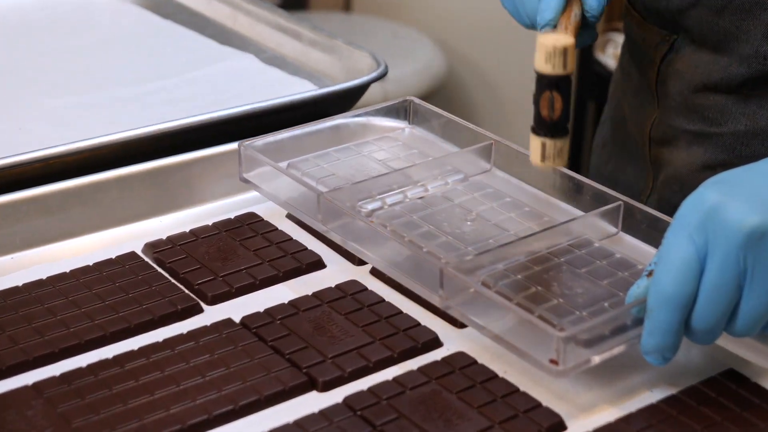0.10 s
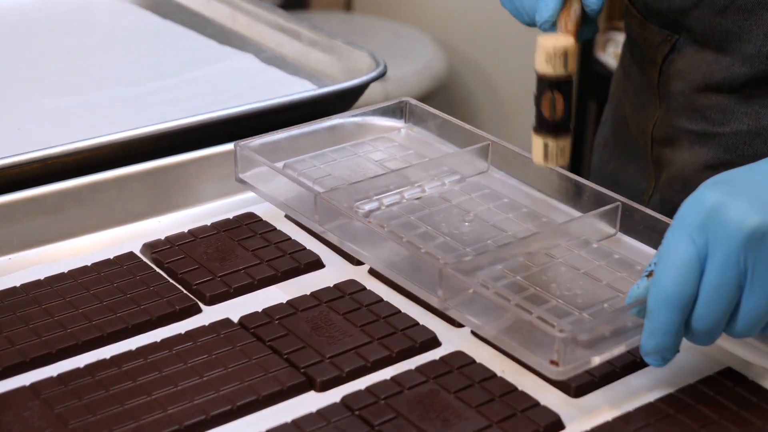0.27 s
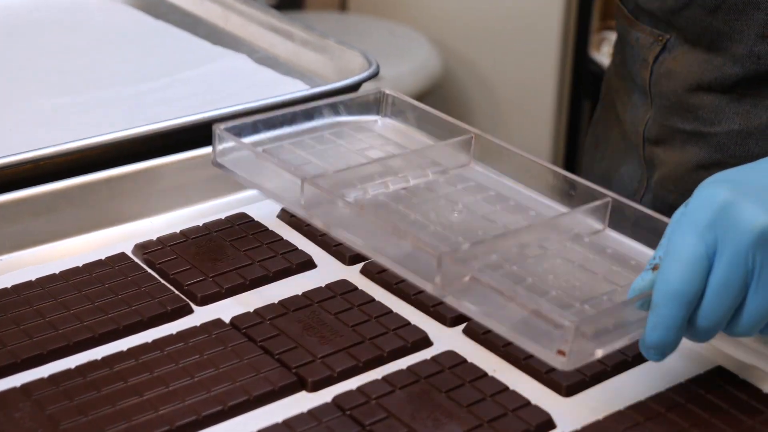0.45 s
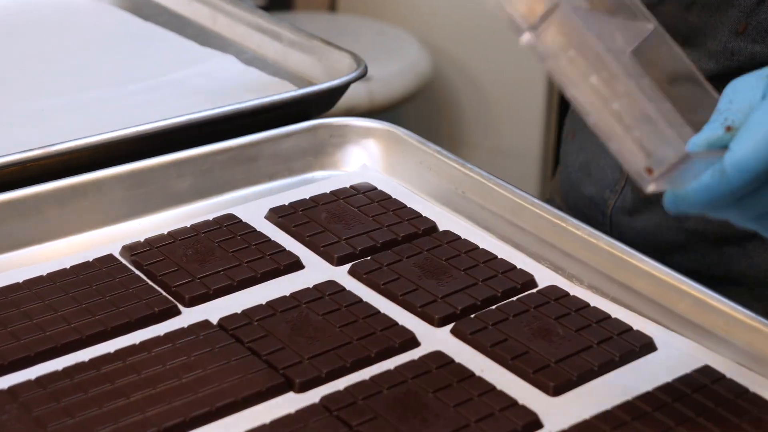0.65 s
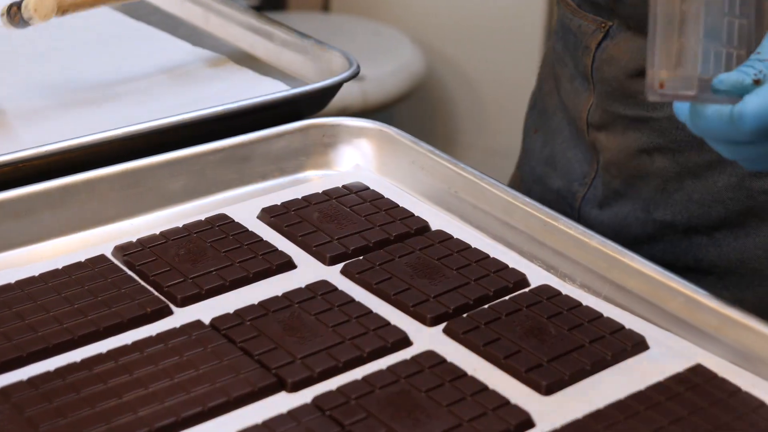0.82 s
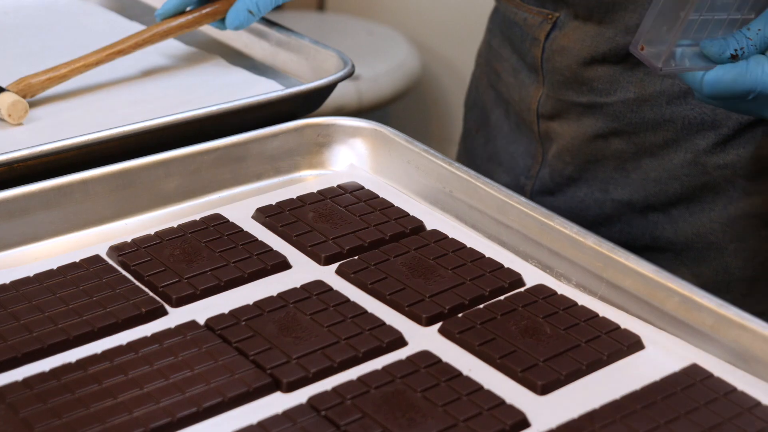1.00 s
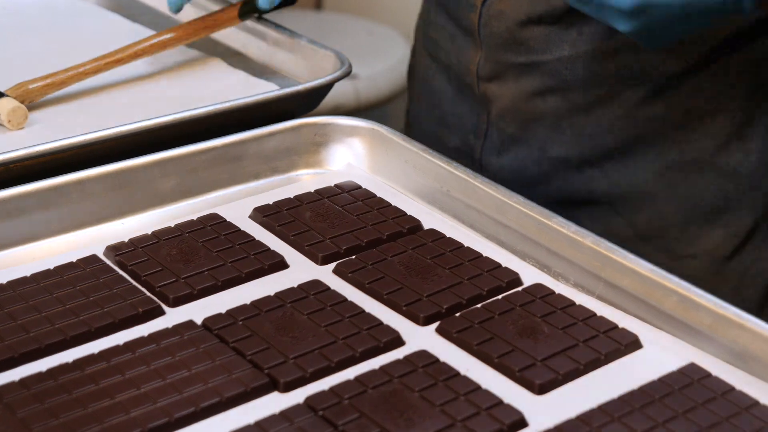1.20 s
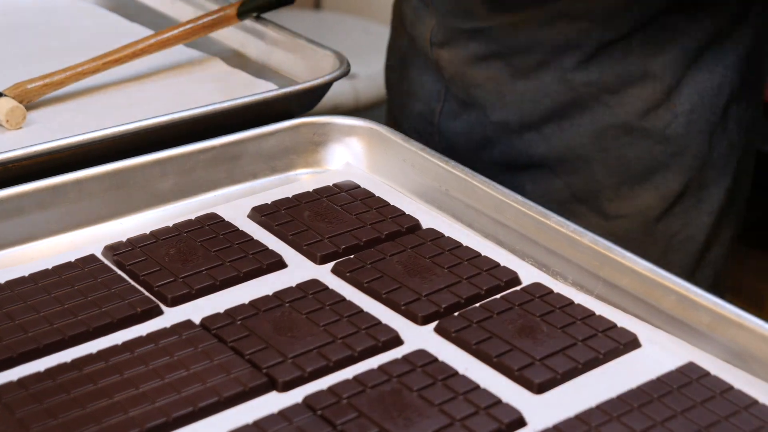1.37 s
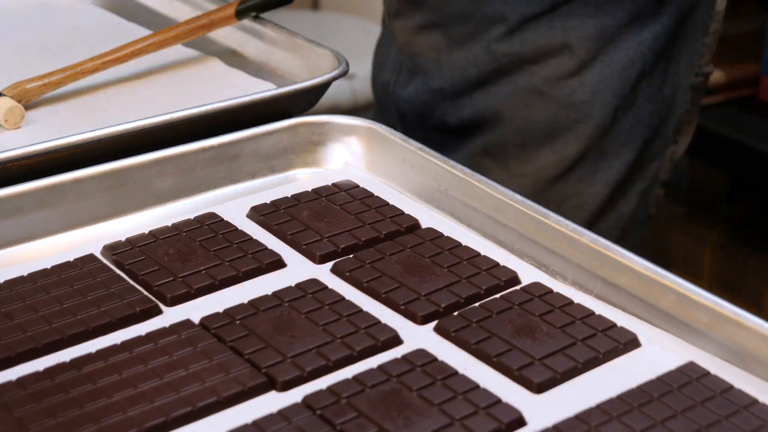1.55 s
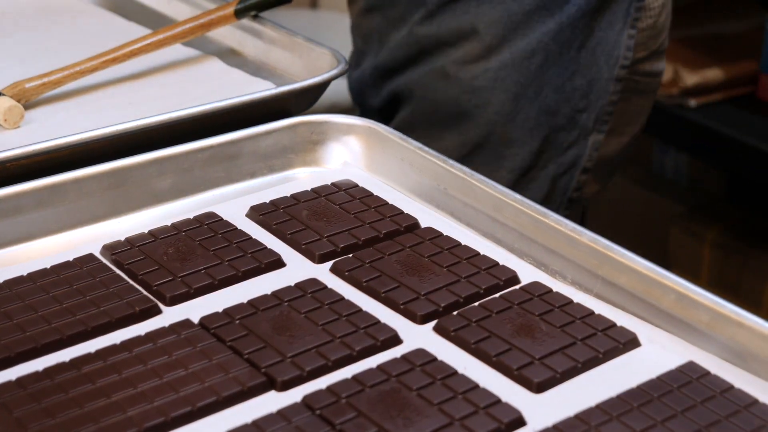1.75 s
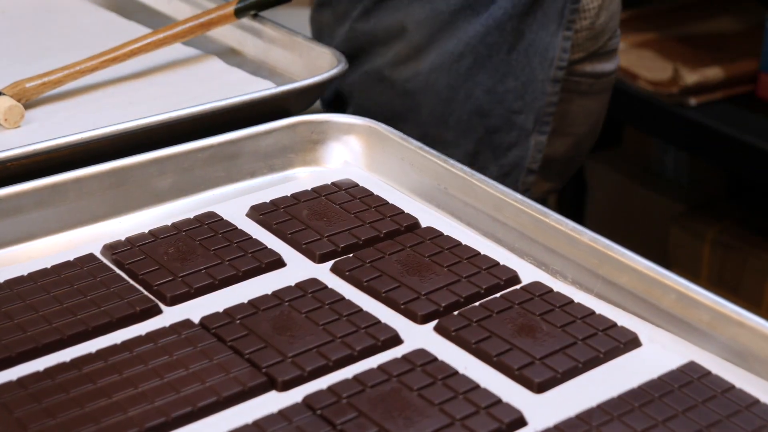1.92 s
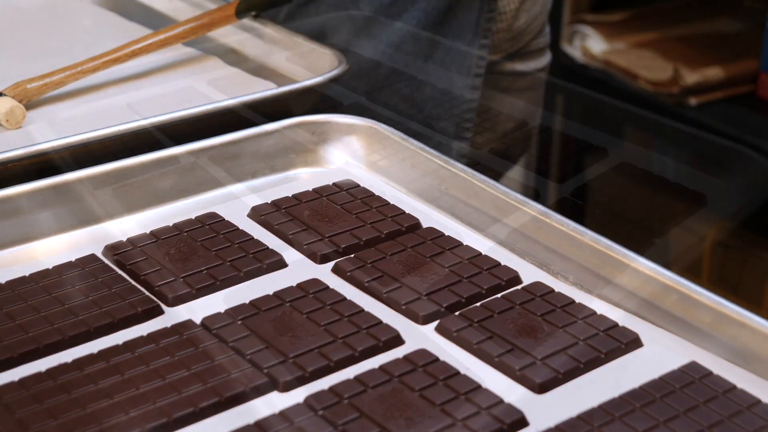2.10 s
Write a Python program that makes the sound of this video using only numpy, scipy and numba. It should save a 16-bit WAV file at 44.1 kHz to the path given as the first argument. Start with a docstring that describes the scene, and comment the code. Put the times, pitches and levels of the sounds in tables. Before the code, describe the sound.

Loud wooden mallet crack on hard plastic, quick chocolate clatter, then mallet set down on a metal tray

```python
"""A wooden mallet raps a plastic mould, chocolate bars drop onto a lined tray, then the mallet is laid on
a metal tray: head first with a bounce, then the handle. Each blow is a half-sine push on decaying modes,
plus a crack and a noisy ring. Cloth rustles faintly as grainy hiss; a small hard room rings with dense
echoes over ventilation noise and hum. The rap clips, and gain control ducks the sound for a moment."""
import sys
import numpy as np
from scipy import signal
from scipy.fft import rfft, irfft
from scipy.io import wavfile
from scipy.ndimage import uniform_filter1d
from numba import njit

SR = 44100
rng = np.random.default_rng(int(sys.argv[2]) if len(sys.argv) > 2 else 0)


def transcribe(signal):
    """Save signal, clipped to [-1, 1], as a 16-bit WAV file at the path in sys.argv[1]."""
    frames = np.atleast_2d(signal).T
    limited = np.clip(frames, -1, 1)
    pcm = np.round(limited * 32767).astype(np.int16)
    wavfile.write(sys.argv[1], SR, pcm)


def nominal_scale(level):
    """Amplitude ratio for a level in decibels (scalar or array-like)."""
    x = np.asarray(level, float) / 20
    return 10 ** x


N = 97020


def unit(x):
    """Scale to rms 1."""
    return x / np.sqrt(np.mean(x ** 2))


def colour(x, curve):
    """Filter by a (freq_hz, gain_db) curve, interpolated over log frequency."""
    freq_hz, gain_db = np.array(curve).T
    f = np.fft.rfftfreq(len(x), 1 / SR)
    gain = nominal_scale(np.interp(np.log(f + 1), np.log(freq_hz), gain_db))
    return irfft(rfft(x) * gain, len(x))


# ventilation spectrum: freq_hz, density_db (per Hz, relative)
AIR_SPECTRUM = [(12, -41), (20, -14), (58, -9), (66, -2.5), (81, -4), (141, -9.5), (202, -7.5), (308, -12),
                (385, -11.5), (494, -11.5), (817, -18), (1170, -21), (1550, -24), (1900, -26), (2600, -32),
                (3400, -28.5), (4500, -36.5), (5300, -46), (8000, -50), (11000, -55), (15700, -56),
                (15900, -93)]
AIR_RMS_DB = -45.5
# hum lines: pitch_hz, rms_db, width_hz
HUM_LINES = [(87, -48.5, 3.84), (119, -59.5, 8.9), (185, -55.5, 10.8), (264.4, -58, 17), (339, -60, 11.74),
             (388, -55.5, 15.95)]


def machines():
    """Ventilation is coloured noise; hum lines are sines slowly wavering in pitch and level."""
    def waver():
        noise = rng.standard_normal(N)
        return unit(uniform_filter1d(uniform_filter1d(noise, size=4000), size=4000))

    out = nominal_scale(AIR_RMS_DB) * unit(colour(rng.standard_normal(N), AIR_SPECTRUM))
    for pitch_hz, rms_db, width_hz in HUM_LINES:
        line_hz = pitch_hz + width_hz / 2 * waver()
        phase = 2 * np.pi * np.cumsum(line_hz) / SR
        out = out + nominal_scale(rms_db + 0.69 * waver()) * np.sqrt(2) * np.sin(phase)
    return out


# crack spectrum: freq_hz, density_db (per Hz, relative)
CRACK_SPECTRUM = [(1000, -1), (3000, 3.5), (5000, -6.5), (8000, -9.5), (11500, -9.5), (15500, -15),
                  (16500, -30)]
CRACK_T60_S = 0.0046
WOBBLE_RMS_DB, WOBBLE_ONSET_S = 4, 0.0033


def struck(blows, modes, blur):
    """Each blow: a half-sine push rings the wobbling modes; a crack and a noisy ring decay with it."""
    t = np.arange(SR // 2) / SR

    def decay(t60_s):
        return 1000. ** (-t / t60_s)

    def noise_burst(spectrum, t60_s):
        return unit(colour(rng.standard_normal(len(t)), spectrum)) * decay(t60_s)

    ring, sign = np.zeros(len(t)), 1
    for pitch_hz, level_db, t60_s in modes:
        drift = unit(uniform_filter1d(rng.standard_normal(len(t)), size=300))
        wobble = nominal_scale(WOBBLE_RMS_DB * np.minimum(t / WOBBLE_ONSET_S, 1) * drift)
        ring += sign * nominal_scale(level_db) * wobble * np.sin(2 * np.pi * pitch_hz * t) * decay(t60_s)
        sign = -sign  # neighbours in opposite phase

    blur_spectrum, blur_t60_s = blur
    out = np.zeros(N + SR)
    for start_s, level_db, contact_ms, crack_db, blur_db in blows:
        late_s = start_s * SR % 1 / SR  # sub-sample start
        push = np.sin(np.pi * np.clip((t[:64] - late_s) / (contact_ms / 1000), 0, 1))
        tonal = np.convolve(ring, push / push.sum())[:len(t)]
        crack = nominal_scale(crack_db) * noise_burst(CRACK_SPECTRUM, CRACK_T60_S)
        noisy = nominal_scale(blur_db) * noise_burst(blur_spectrum, blur_t60_s)
        out[int(start_s * SR):][:len(t)] += nominal_scale(level_db) * (tonal + crack + noisy)
    return out[:N]


# blow: start_s, level_db, contact_ms, crack_db, blur_db
RAP_BLOW = [(0.2178, 18.5, .25, -20, -19.5)]
# plastic modes: pitch_hz, level_db, t60_s
MOULD_MODES = [(553.3, -22.5, 0.079), (690, -16.5, 0.05), (717, 2.5, 0.013), (826.5, -14.5, 0.09),
               (895, -24.5, 0.12), (1250, -26.5, .1), (1182, -33, 0.034), (1456, -0.5, 0.014),
               (2100, -11, 0.0139), (3410, -21, 0.055), (4640, -15.5, .015), (7020, -50, 0.0033),
               (9300, -22, 0.0085)]
# close modes blurred to noise: [freq_hz, density_db (per Hz, relative)], t60_s
MOULD_NOISE = [(300, -30.5), (600, -3), (900, -15), (1300, -4.5), (2000, -1.5), (3600, -0.5), (4600, -15),
               (5200, -18), (9000, -36.5), (16000, -42.5)], 0.092


def mallet_rap():
    """Wood on a plastic mould: short modes and countless close ones that blur into noise."""
    return struck(RAP_BLOW, MOULD_MODES, MOULD_NOISE)


# room bands: centre_hz, echo_db, t60_s
ROOM_BANDS = [(250, -40, 0.55), (500, -35.5, 0.19), (1030, -43, 0.32), (1910, -41, 0.33),
              (4040, -42.5, 0.43), (8000, -44.5, 0.35), (14000, -45, 0.15)]
ROOM_ONSET_S = 0.012


def room(x):
    """Dense echoes swell in, then die away band by band."""
    t = np.arange(SR) / SR
    log_f = np.log(np.fft.rfftfreq(SR, 1 / SR) + 1)
    log_centres = np.log(np.array(ROOM_BANDS)[:, 0])
    noise = rfft(rng.standard_normal(SR))
    tail = 0
    for k, (_, echo_db, t60_s) in enumerate(ROOM_BANDS):
        share = np.interp(log_f, log_centres, np.arange(len(ROOM_BANDS)) == k)  # crossfaded bands
        tail = tail + nominal_scale(echo_db) * irfft(noise * share, SR) * 1000. ** (-t / t60_s)
    onset = 1 - np.exp(-(t / ROOM_ONSET_S) ** 2)
    return signal.fftconvolve(x, tail * onset)[:N]


# blows: start_s, level_db, contact_ms, crack_db, blur_db
BAR_BLOWS = [(0.2739, -17.5, 0.33, 5.5, 7), (0.2752, -5, 0.19, -20, -17.5),
             (0.2792, -23.5, 0.3, 0.5, -18.5), (0.284, -18.5, 0.45, -10, -8.5)]
# bar modes: pitch_hz, level_db, t60_s
BAR_MODES = [(1243, 2, 0.017), (2020, -2.5, 0.013), (2282, -5, 0.026), (2940, -64, .04),
             (3680, -12.5, 0.0087), (3970, 8.5, 0.0083), (6105, -5.5, 0.037), (7700, -19, .01)]
# close modes blurred to noise: [freq_hz, density_db (per Hz, relative)], t60_s
BAR_NOISE = [(400, -21), (1200, 2), (2000, -6.5), (3200, -13.5), (4500, -10), (5400, -16.5), (11000, -22.5),
             (16000, -29.5)], 0.033


def bar_drops():
    """Chocolate on a lined tray: a quick cluster of short, damped knocks."""
    return struck(BAR_BLOWS, BAR_MODES, BAR_NOISE)


# rustles: peak_s, level_db, rise_s, fall_s
CLOTH_RUSTLES = [(.78, -65, 0.071, 0.074), (0.988, -55.5, 0.05, 0.023), (1.51, -59.5, 0.012, 0.032),
                 (1.581, -66, 0.038, 0.072), (1.65, -64.5, 0.027, 0.018), (1.938, -62, .012, 0.019),
                 (2.112, -58, .03, .025)]
# hiss spectrum: freq_hz, density_db (per Hz, relative)
CLOTH_SPECTRUM = [(1000, -8), (3500, 0), (6000, -10), (10000, -15), (15700, -18), (15900, -50)]


def cloth():
    """Rubbing fibres: soft Gaussian swells of grainy hiss."""
    t = np.arange(N) / SR
    swell = np.zeros(N)
    for peak_s, level_db, rise_s, fall_s in CLOTH_RUSTLES:
        width_s = np.where(t < peak_s, rise_s, fall_s)
        swell += nominal_scale(level_db) * np.exp(-((t - peak_s) / width_s) ** 2)
    grain = nominal_scale(1.6 * unit(uniform_filter1d(rng.standard_normal(N), size=60)))
    return swell * unit(colour(grain * rng.standard_normal(N), CLOTH_SPECTRUM))


# blows, bounce included: start_s, level_db, contact_ms, crack_db, blur_db
HEAD_BLOWS = [(1.0052, -18, 0.41, 4.5, -20), (1.0062, -3, 0.48, -14.5, -18.5), (1.013, -5, 0.12, 3, -14.5),
              (1.078, -17.5, 0.36, -14, -10.5)]
# head-on-tray modes: pitch_hz, level_db, t60_s
HEAD_MODES = [(170, -13, 0.029), (356, -21, 0.18), (625, -23.5, 0.035), (1145, -3.5, 0.0067),
              (1530, -10.5, 0.015), (2380, -34, .03), (2920, -2, 0.012), (3350, -3.5, 0.012)]
# close tray modes blurred to noise: [freq_hz, density_db (per Hz, relative)], t60_s
TRAY_NOISE = [(150, -28), (340, -4), (700, 0.5), (1160, 0), (2000, -4.5), (3200, -5), (4500, -7.5),
              (5300, -19), (8000, -17), (12500, -39.5), (16000, -49)], 0.19


def head_knocks():
    """Mallet head on a metal tray: short modes over a longer noisy ring, with a bounce."""
    return struck(HEAD_BLOWS, HEAD_MODES, TRAY_NOISE)


# blows: start_s, level_db, contact_ms, crack_db, blur_db
HANDLE_BLOWS = [(1.166, -5.5, 0.14, -15, -8.5), (1.1702, -12, 0.3, -10.5, -14)]
# handle-on-tray modes: pitch_hz, level_db, t60_s
HANDLE_MODES = [(180, -14.5, 0.05), (271, -20.5, 0.11), (566, -29, 0.073), (861, -7.5, 0.051),
                (1065, -5.5, 0.018), (1249, -15.5, 0.21), (1846, -49, 0.12), (2047, -12, .07),
                (2362, -3, 0.03), (2546, -7.5, 0.049), (3560, -1.5, 0.017), (5820, -3, 0.0034)]
# close rim modes blurred to noise: [freq_hz, density_db (per Hz, relative)], t60_s
RIM_NOISE = [(150, -21), (300, -1.5), (600, -5.5), (1300, 1), (2300, 0.5), (3600, -5.5), (4600, -13),
             (6500, -36), (12000, -47), (16000, -49)], 0.17


def handle_knocks():
    """Handle laid on the tray: two close knocks ring its modes and a noisy rim."""
    return struck(HANDLE_BLOWS, HANDLE_MODES, RIM_NOISE)


BASS_CUT_HZ = 600


def scene():
    """All knocks (small things radiate little bass), their room, cloth and machines."""
    knocks = mallet_rap() + bar_drops() + head_knocks() + handle_knocks()
    bass_cut = signal.butter(1, BASS_CUT_HZ, "high", fs=SR, output="sos")
    knocks = signal.sosfilt(bass_cut, knocks)
    return (knocks + room(knocks) + cloth() + machines())[None]


@njit
def follow(x, attack, release):
    """Peak follower: quick up, slow down; attack and release are per-sample fractions."""
    level, out = 0., np.empty(len(x))
    for i in range(len(x)):
        peak = abs(x[i])
        level += (peak - level) * (attack if peak > level else release)
        out[i] = level
    return out


THRESHOLD_DB, RATIO = -8, 9
ATTACK_S, RELEASE_S = .0025, .11
TOP_HZ = 16500


def band_limit(x):
    """A steep low-pass at the top of the band."""
    return signal.sosfilt(signal.butter(12, 16540, fs=SR, output="sos"), x)


def record(dry):
    """Gain control above a threshold, top cut, then clipping at full scale."""
    level = follow(dry[0], 1 / (ATTACK_S * SR), 1 / (RELEASE_S * SR))
    gain = np.minimum(1, nominal_scale(THRESHOLD_DB) / (level + 1e-9)) ** (1 - 1 / RATIO)
    top_cut = signal.ellip(8, .2, 70, TOP_HZ, fs=SR, output="sos")
    mix = signal.sosfilt(top_cut, dry * gain)
    return band_limit(np.clip(mix, -1, 1))


dry = scene()
out = record(dry)
transcribe(out)
```